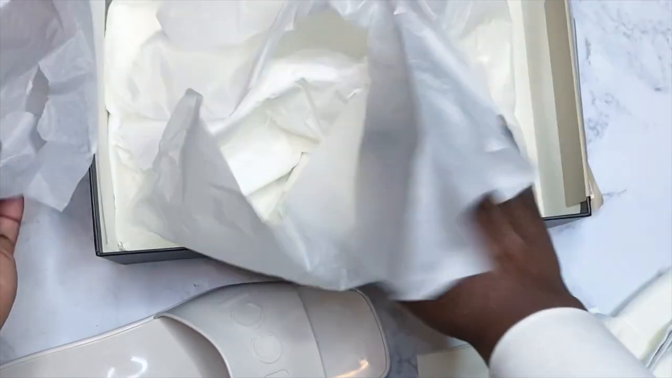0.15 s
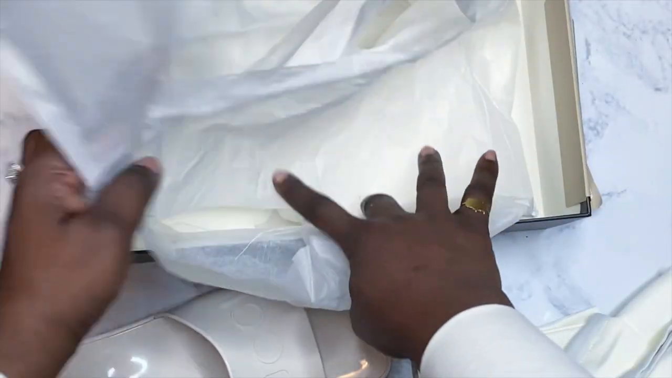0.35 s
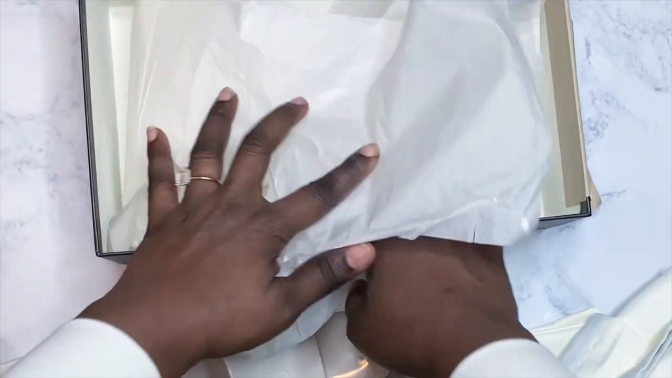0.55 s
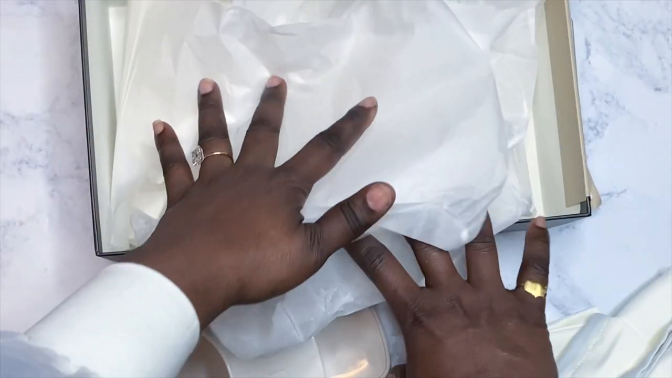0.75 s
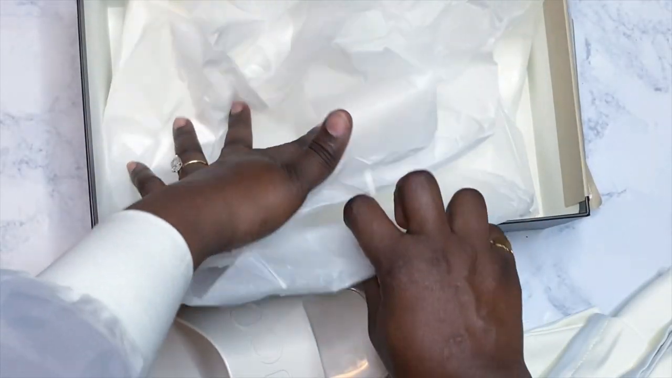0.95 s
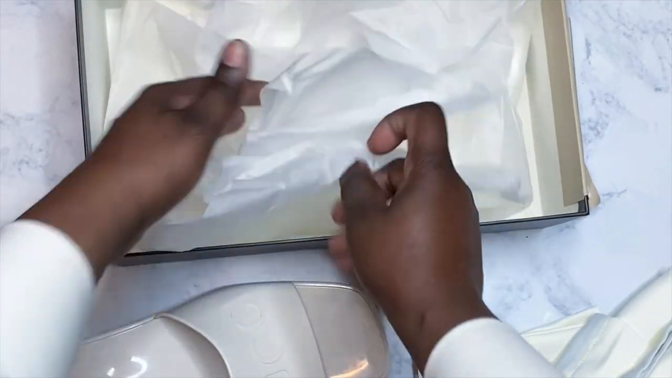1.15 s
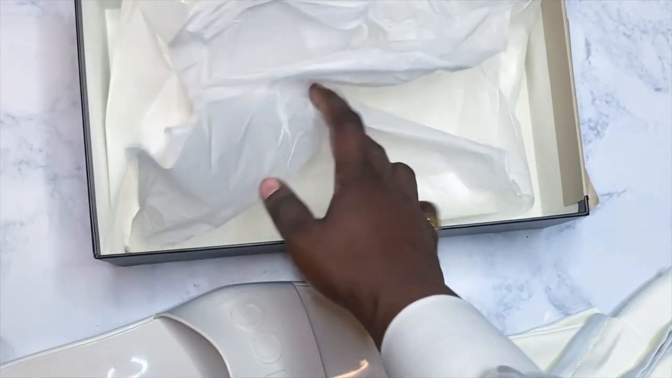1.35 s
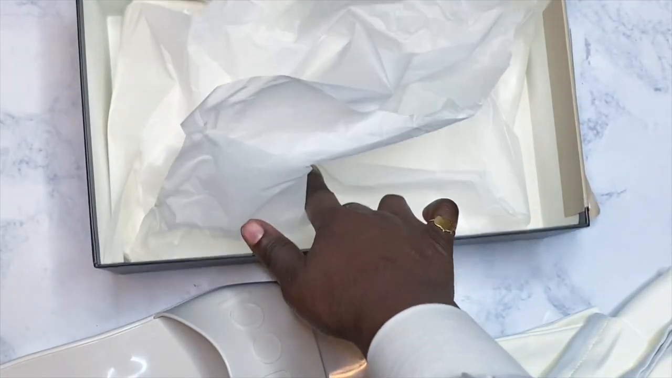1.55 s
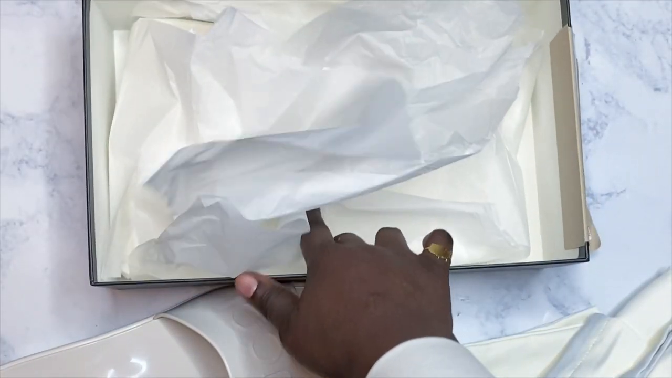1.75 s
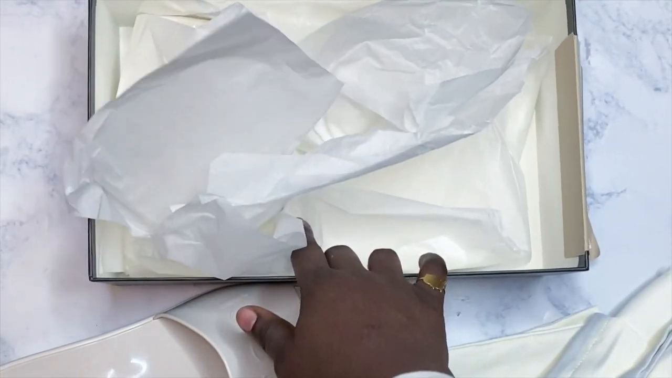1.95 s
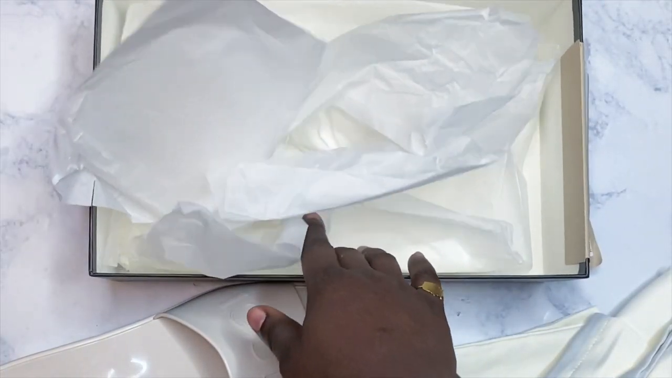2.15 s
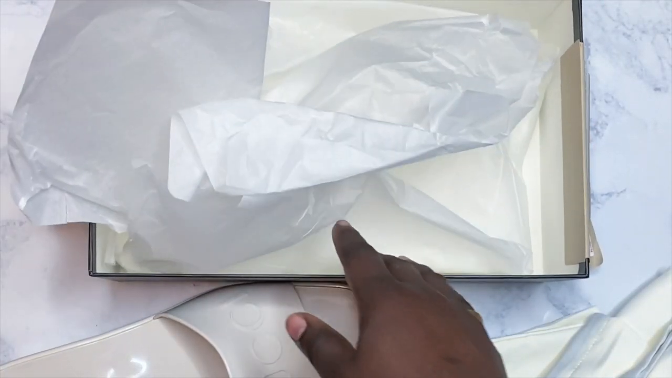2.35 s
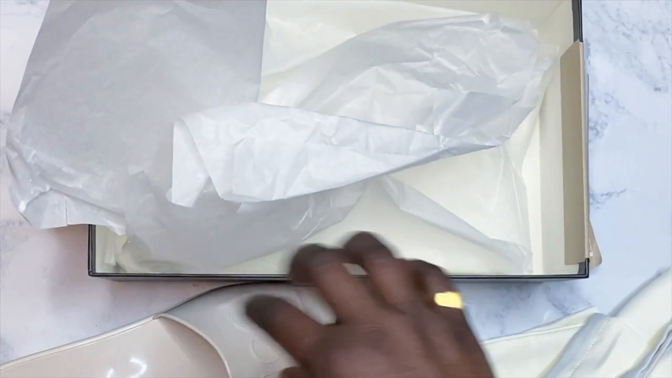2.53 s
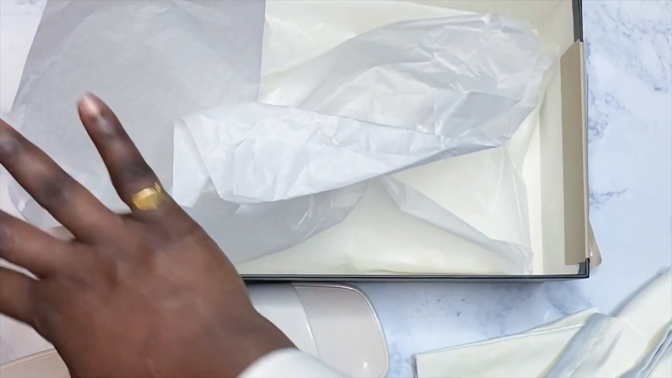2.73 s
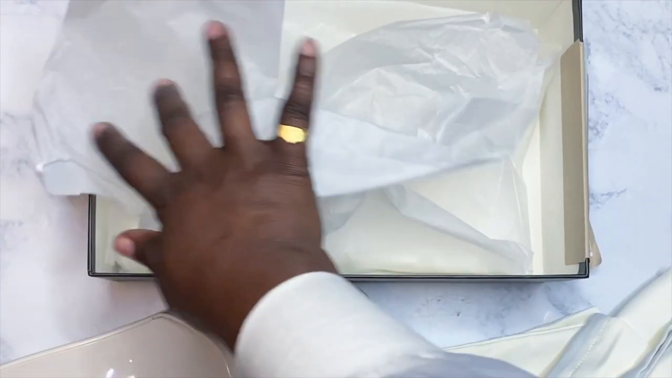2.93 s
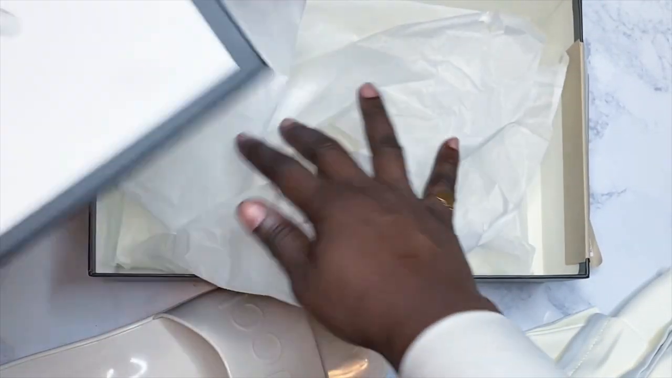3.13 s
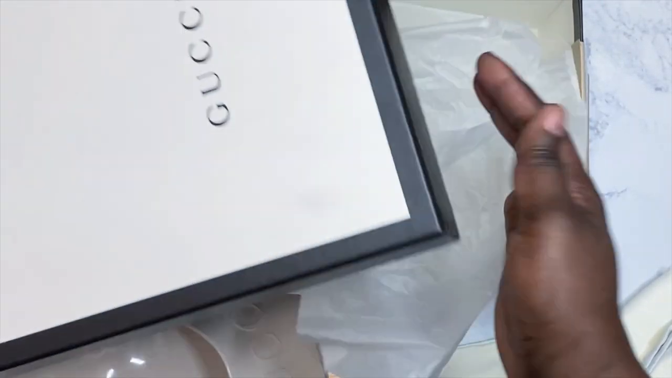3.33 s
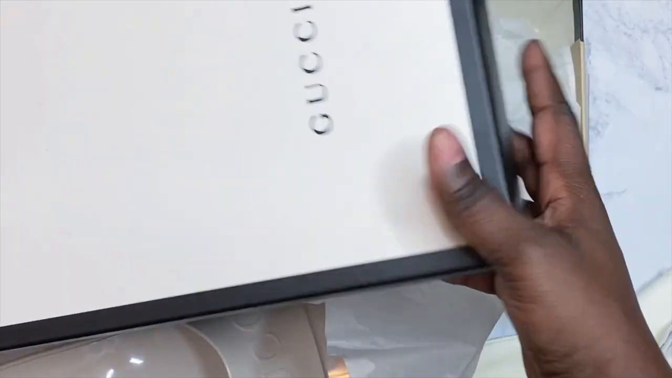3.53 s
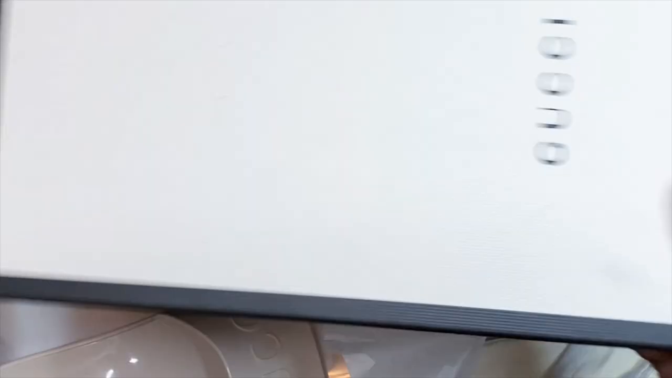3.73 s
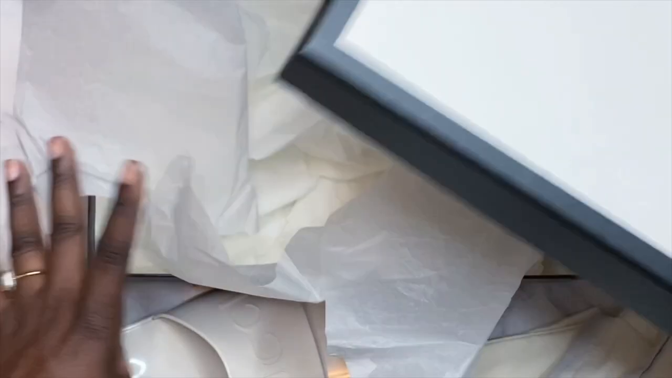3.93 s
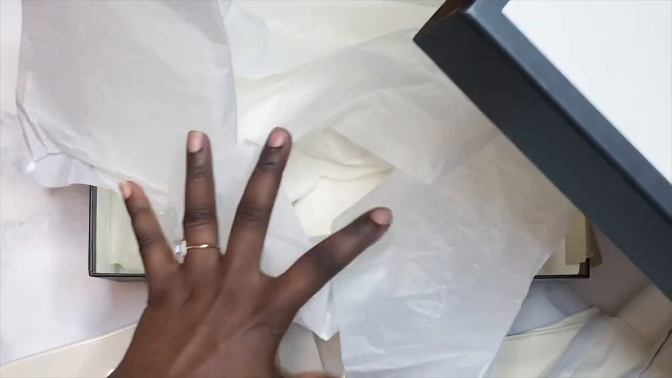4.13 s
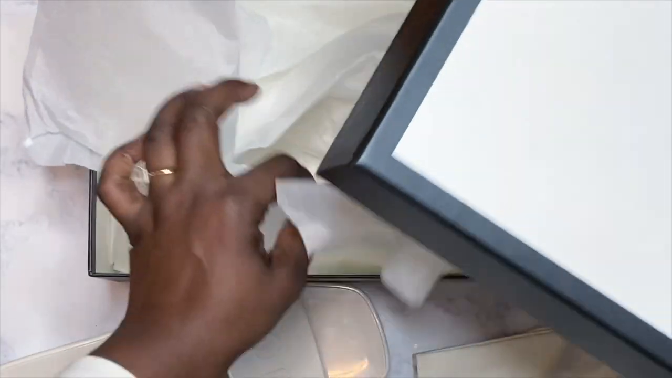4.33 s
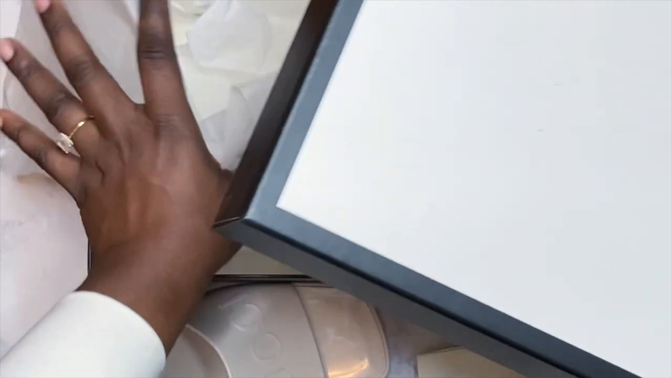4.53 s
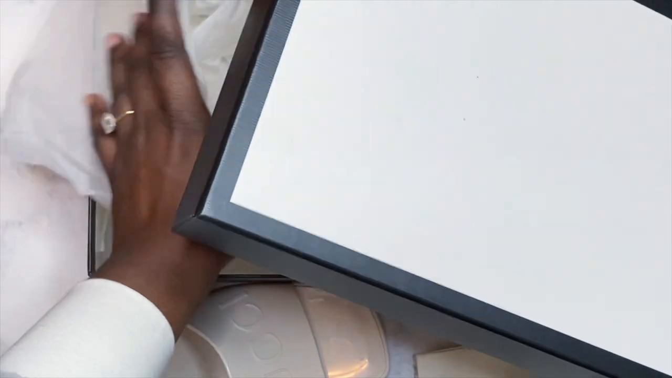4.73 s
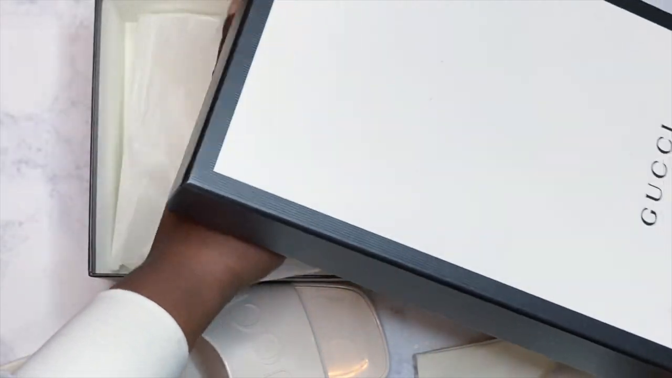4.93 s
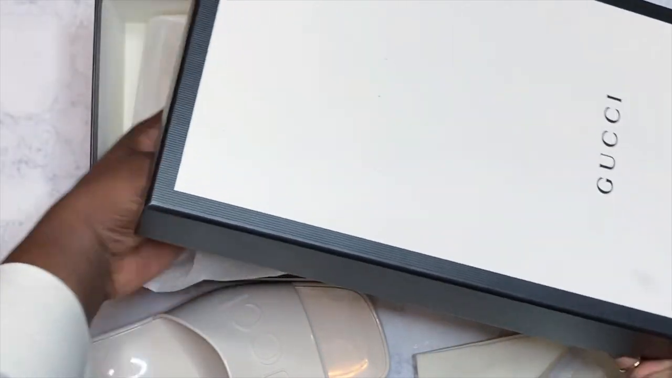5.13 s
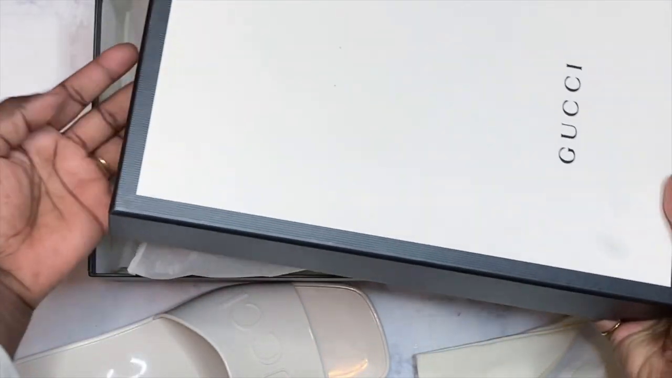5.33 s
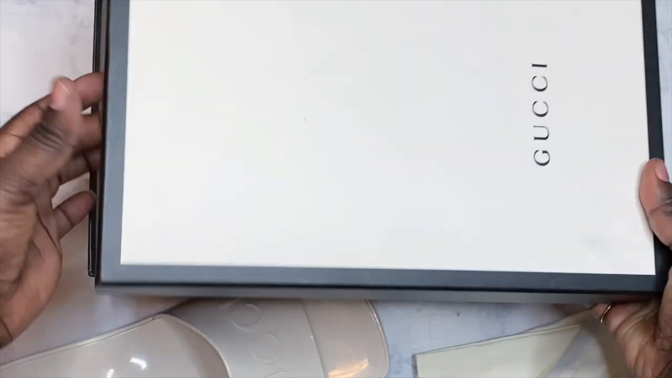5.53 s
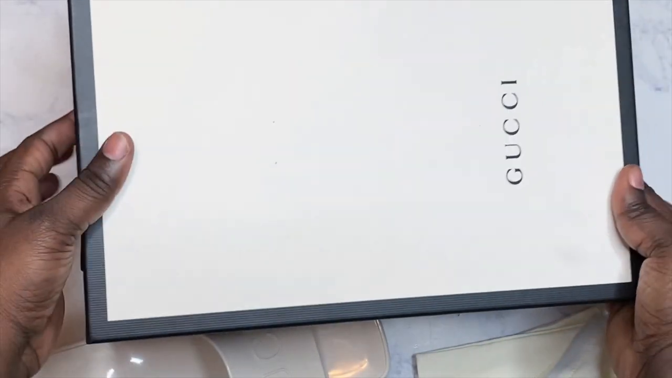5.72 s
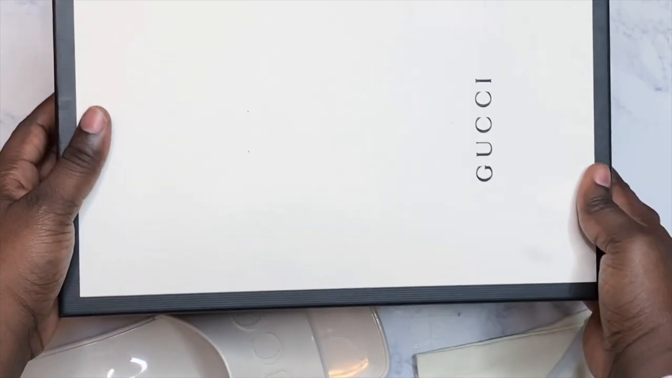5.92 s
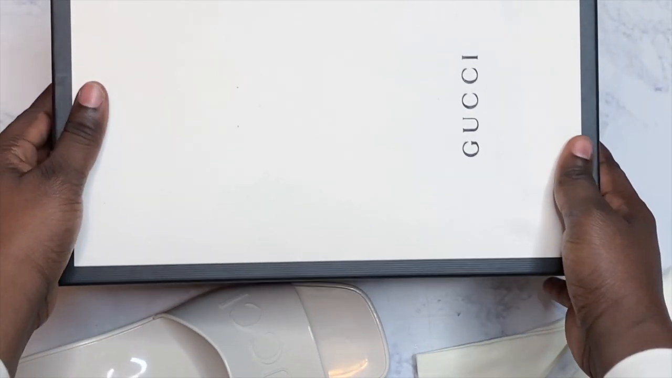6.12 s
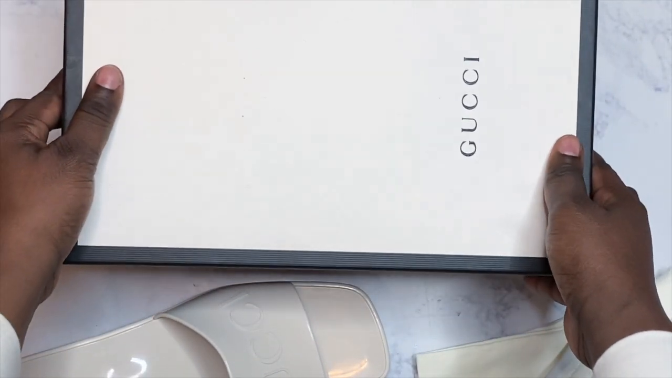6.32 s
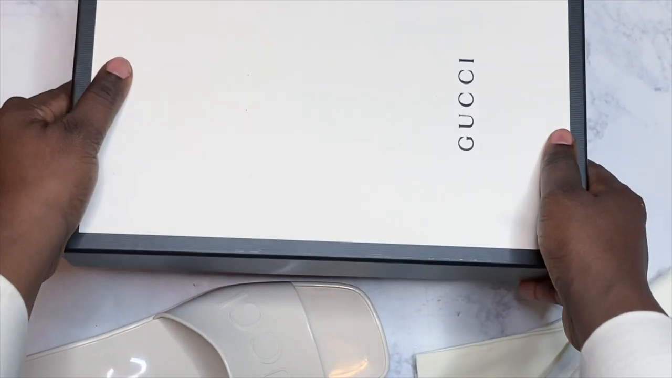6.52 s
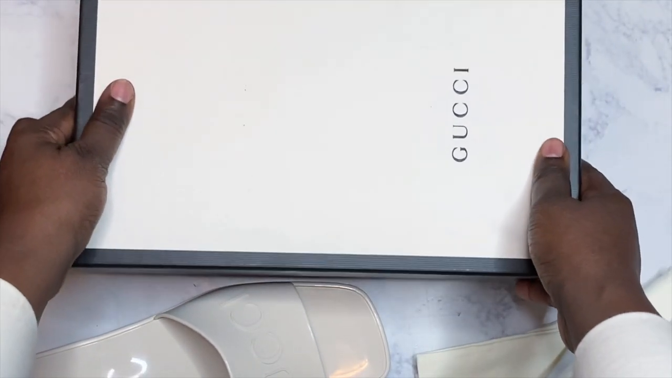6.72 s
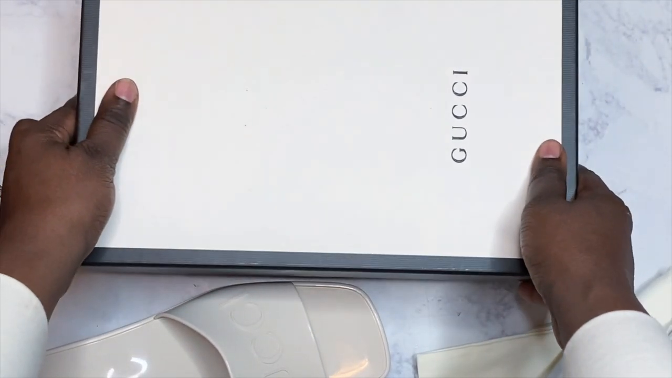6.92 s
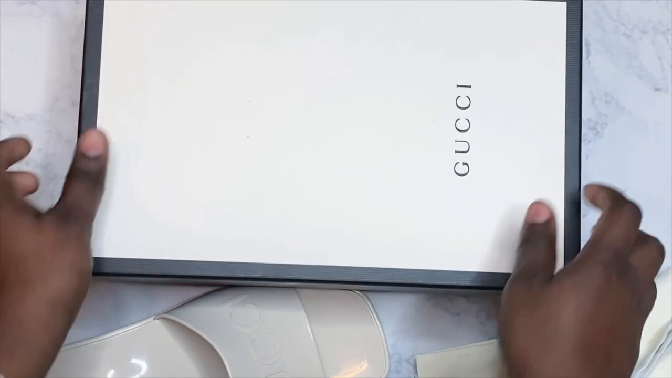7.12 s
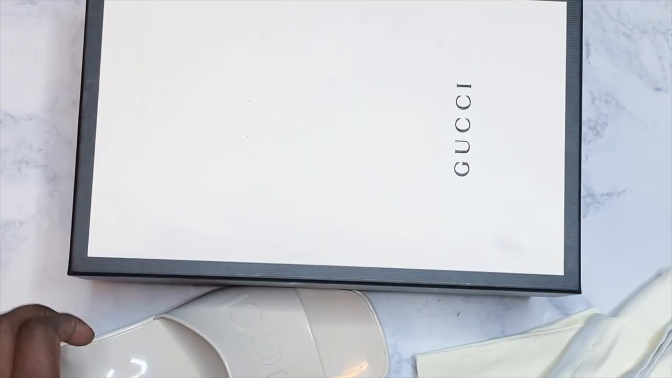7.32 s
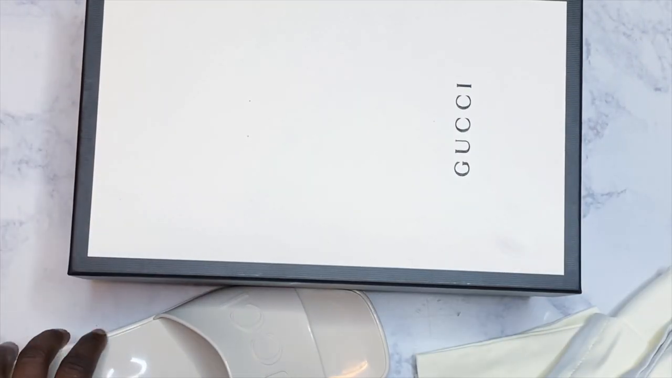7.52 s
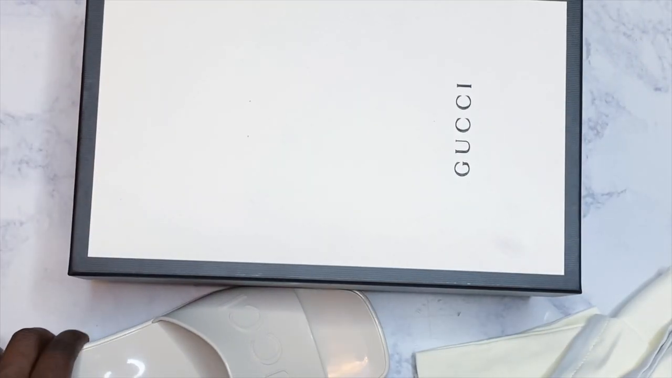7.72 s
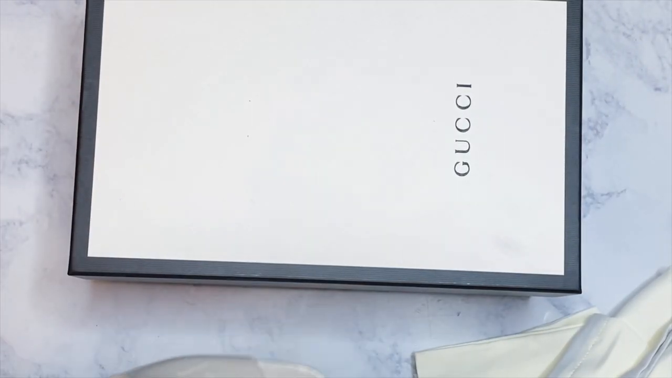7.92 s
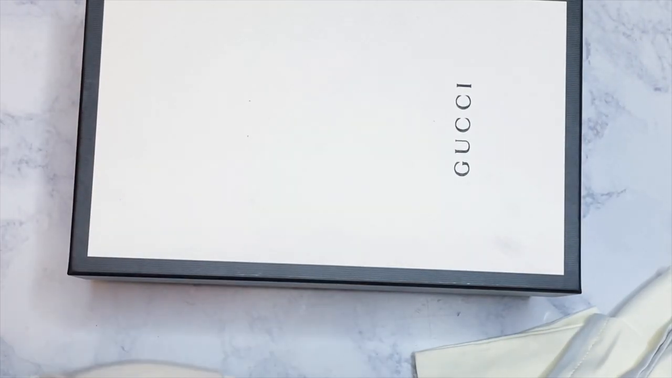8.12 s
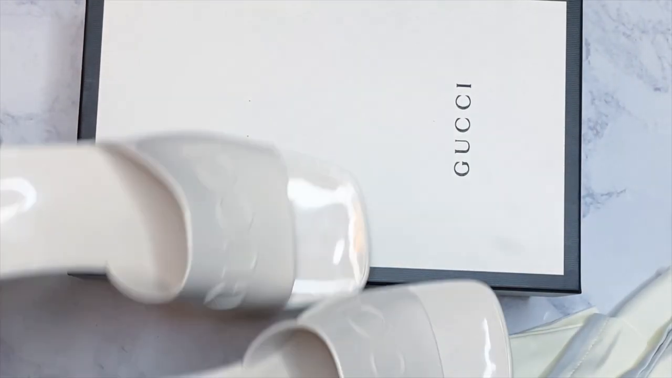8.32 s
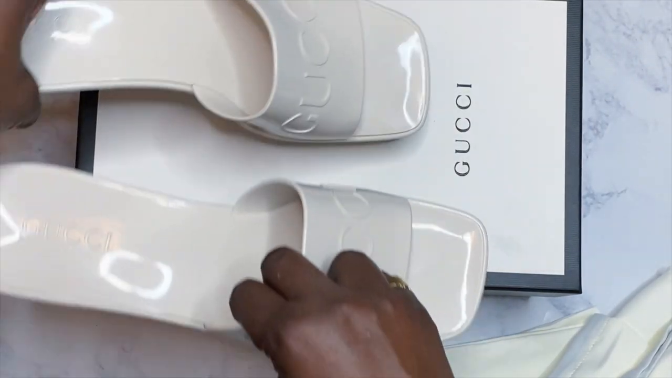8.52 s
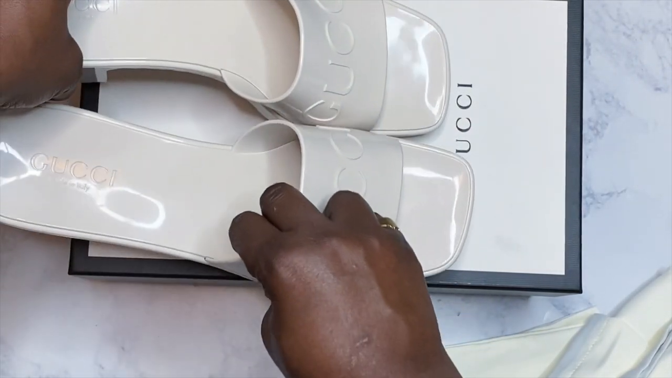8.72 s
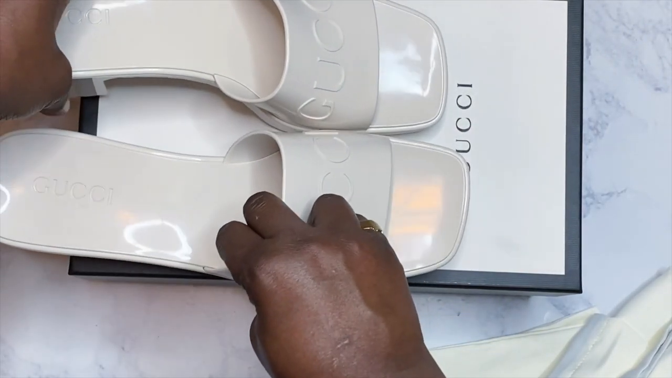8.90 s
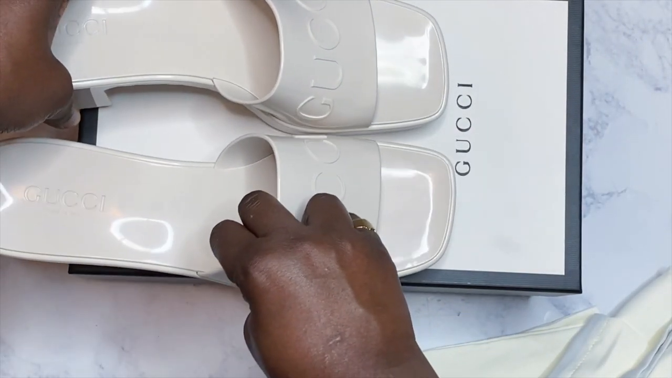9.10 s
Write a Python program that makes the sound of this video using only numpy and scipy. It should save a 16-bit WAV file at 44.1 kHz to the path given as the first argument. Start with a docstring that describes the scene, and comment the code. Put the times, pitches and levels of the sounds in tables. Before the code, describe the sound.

Close, crisp paper rustling fades, a box lid slides down with hollow knocks, and two sandals are set on it in a quiet room.

```python
"""First, right by the microphone, hands press and smooth tissue paper into a cardboard shoebox on a table.
The place is a small, quiet room. The lid is fetched, bumps the box, is shoved squeaking down over the rim
and knocks home; then two sandals are set on top. Paper, sliding lid and brushes are random bursts of noise
shaped by spectra and hand movements; squeaks are gliding tones; knocks ring the modes of the box.
Behind them lie filtered-noise air and rumble, and a faint buzz of mains-rate spikes."""
import sys
import numpy as np
from scipy import signal
from scipy.fft import rfft, irfft, next_fast_len
from scipy.io import wavfile
from scipy.ndimage import uniform_filter1d

SR = 44100
rng = np.random.default_rng(int(sys.argv[2]) if len(sys.argv) > 2 else 0)


def bounce(signal):
    """Save signal as a 16-bit WAV file at the path given by the first command-line argument."""
    frames = np.transpose(np.atleast_2d(signal))
    limited = np.clip(frames, -1, 1)
    pcm = np.round(limited * 32767).astype(np.int16)
    wavfile.write(sys.argv[1], SR, pcm)


N = 408366  # samples, about 9.3 s


def from_db(db):
    """Amplitude ratio of a level in dB."""
    return 10 ** (np.asarray(db) / 20)


def rms_one(x):
    """Scale to an rms of 1."""
    return x / np.sqrt(np.mean(x ** 2) + 1e-20)


def drift(rate):
    """Smooth random wandering of rms 1, with a new target `rate` times a second."""
    knots = rng.standard_normal(int(rate * N / SR) + 3)
    return rms_one(np.interp(np.arange(N) * rate / SR, np.arange(len(knots)), knots))


def coloured(x, spectrum):
    """Causal (minimum-phase) filter with the given spectrum and unit mean power gain."""
    size = next_fast_len(len(x) + 4096)
    size += size % 2
    hz, db = np.transpose(spectrum)
    octave = np.log2(np.maximum(np.fft.rfftfreq(size, 1 / SR), 1))
    below = np.maximum(np.log2(hz[0]) - octave, 0)
    above = np.maximum(octave - np.log2(hz[-1]), 0)
    # beyond the listed points it falls 20 dB per octave, for two octaves
    level_db = np.interp(octave, np.log2(hz), db) - 20 * np.minimum(below + above, 2)
    gain = rms_one(from_db(level_db))
    # folding the cepstrum onto positive times gives the minimum phase
    cepstrum = irfft(np.log(gain))
    cepstrum[1:size // 2] *= 2
    cepstrum[size // 2 + 1:] = 0
    return irfft(rfft(x, size) * np.exp(rfft(cepstrum)), size)[:len(x)]


def band(x, low_hz, high_hz):
    """Keep the sound between two frequencies."""
    edges = [low_hz, min(high_hz, .45 * SR)]
    return signal.sosfilt(signal.butter(2, edges, "band", fs=SR, output="sos"), x)


def add(out, s, sound):
    """Mix a sound in at a time; what lies before zero is cut off."""
    start, sound = max(round(s * SR), 0), sound[max(-round(s * SR), 0):]
    out[start:start + len(sound)] += sound[:len(out) - start]


def grains(per_s, spread_db, ring_s, smooth):
    """Random tiny bursts, a few large among many small, over a share of smooth friction; rms 1."""
    size_db = spread_db * np.minimum(rng.exponential(1, N), 4.5)
    energy = (rng.random(N) < per_s / SR) * from_db(size_db) ** 2
    energy = signal.lfilter([1], [1, -np.exp(-2 / (ring_s * SR))], energy + 1e-18)
    return rms_one(np.sqrt(energy / energy.mean() + smooth) * rng.standard_normal(N))


ATTACK_S, RELEASE_DB_PER_S = 0.013, 275


def movement(start_s, length_s, level_db, build_db=0):
    """Gain of one hand movement: quick attack, a hold that builds or eases, release."""
    gain, t = np.zeros(N + SR), np.arange(int((length_s + .3) * SR)) / SR
    hold_db = level_db + build_db * (np.minimum(t / length_s, 1) - .5)
    release_db = RELEASE_DB_PER_S * np.maximum(t - length_s, 0)
    add(gain, start_s, np.minimum(t / ATTACK_S, 1) * from_db(hold_db - release_db))
    return gain[:N]


def movements(rows):
    """Overlapping movements add in power."""
    return np.sqrt(sum(movement(*row) ** 2 for row in rows))


# spectrum of the quiet room air: (frequency [Hz], relative density [dB])
AIR_SPECTRUM = [(32, -41), (55, -12.5), (159, -6.5), (232, -16.5), (267, -8.5), (339, -10.5), (439, -15.5),
                (850, -20), (934, -22), (1730, -29.5), (1900, -31.5), (15500, -43.5)]
# spectrum of the deep rumble below it: (frequency [Hz], relative density [dB])
RUMBLE_SPECTRUM = [(12, -12.5), (20, 5), (28, -3), (38, -21), (55, -18), (90, -26)]
AIR_DB, RUMBLE_DB, RUMBLE_WANDER_DB = -66.5, -54, 1.5


def backdrop():
    """Filtered noise: quiet room air over a deep rumble that slowly swells and sinks."""
    # one extra second lets the filters settle
    air = rms_one(coloured(rng.standard_normal(N + SR), AIR_SPECTRUM)[SR:])
    rumble = rms_one(coloured(rng.standard_normal(N + SR), RUMBLE_SPECTRUM)[SR:])
    return from_db(AIR_DB) * air + from_db(RUMBLE_DB + RUMBLE_WANDER_DB * drift(2.37)) * rumble


BUZZ_HZ, BUZZ_DB = 119.95, -79


def buzz(low_hz=3500, jitter_s=.00004):
    """Faint electrical buzz: a short, slightly unsteady spike on every half wave of the mains."""
    spikes, times = np.zeros(N), np.arange(0, N / SR, 1 / BUZZ_HZ)
    times = times + jitter_s * rng.standard_normal(len(times))
    spikes[np.clip(times * SR, 0, N - 1).astype(int)] = 1
    highpass = signal.butter(1, low_hz, "high", fs=SR, output="sos")
    return from_db(BUZZ_DB) * rms_one(signal.sosfilt(highpass, spikes + 1e-18))


ROOM_T60_S = 0.28


def room(x, first_s, dull_hz):
    """Diffuse tail of the small room: decaying noise, band-limited, that smears the sound."""
    t = np.arange(int(.6 * SR)) / SR
    tail = rng.standard_normal(len(t)) * from_db(-60 * t / ROOM_T60_S) * (t > first_s)
    return signal.fftconvolve(x, band(tail / np.linalg.norm(tail), 67, dull_hz))[:N]


# hands and soles brush lightly over the cardboard: (start [s], length [s], level [dB], centre [Hz])
BRUSH_STROKES = [(7.042, 0.17, -73, 1680), (7.703, 0.21, -80.5, 900), (9.12, 0.078, -76, 5500)]


def brushes(reach=1.63):
    """Soft, broad friction of a light touch."""
    friction = grains(per_s=180, spread_db=0.5, ring_s=.003, smooth=1.0)
    out = np.zeros(N)
    for s, length, db, hz in BRUSH_STROKES:
        out += movement(s, length, db) * rms_one(band(friction, hz / reach, hz * reach))
    return out


# the box wall groans as hand and lid drag across it: (start [s], length [s], level [dB])
WALL_GROANS = [(4.75, 0.16, -49.5), (4.97, 0.2, -48), (5.64, 0.039, -53)]
GROAN_HZ, GROAN_REACH = 369, 1.14  # the band spans this ratio to either side


def groan():
    """Uneven slips keep one panel resonance going."""
    slips = grains(per_s=160, spread_db=6.0, ring_s=0.015, smooth=0.83)
    panel = band(slips, GROAN_HZ / GROAN_REACH, GROAN_HZ * GROAN_REACH)
    return movements(WALL_GROANS) * rms_one(panel)


# faint squeaks of the tight lid:
# (start [s], length [s], level of the fundamental [dB], starting pitch [Hz], climb [Hz per s])
LID_SQUEAKS = [(5.775, 0.19, -77, 3560, 800), (5.99, .015, -62, 3800, 2480), (6.46, 0.063, -69, 2720, 4500),
               (6.563, 0.11, -62, 3010, 5000)]


def squeaks(waver_per_s=640, second_db=-6, third_db=-1):
    """A broken, narrow squeak with two overtones that climbs as the lid binds."""
    out, t = np.zeros(N), np.arange(N) / SR
    waver = drift(waver_per_s) + 1j * drift(waver_per_s)  # unsteady in strength and phase
    stutter = rms_one(from_db(3 * drift(160)))
    for s, length, db, start_hz, climb_hz_per_s in LID_SQUEAKS:
        pitch_hz = start_hz + climb_hz_per_s * np.clip(t - s, 0, length)
        turn = np.exp(2j * np.pi * np.cumsum(pitch_hz) / SR)
        overtones = from_db(second_db) * turn ** 2 + from_db(third_db) * turn ** 3
        out += movement(s, length, db) * np.real(waver * (turn + overtones))
    return stutter * out


# shoves that work the lid down: (start [s], length [s], rasp [dB], build-up [dB],
# drone of the panels [dB], boom of the air inside [dB])
LID_SHOVES = [(5.445, 0.13, -56.5, -4, -55.5, -65), (5.602, 0.33, -63, -4, -58, -65.5),
              (5.947, 0.29, -61.5, -2, -59, -77), (6.201, 0.18, -60.5, 3, -52.5, -49.5),
              (6.39, 0.25, -61.5, 8, -54.5, -55.5), (6.594, 0.068, -53, 9, -53.5, -53),
              (6.686, .13, -68.5, -1.5, -59.5, -60), (6.908, 0.074, -68.5, 15, -61, -55)]
# spectra of the rasp, the panels and the enclosed air: (frequency [Hz], relative density [dB])
RASP_SPECTRUM = [(1290, -24), (2200, -14), (3080, -6.5), (5450, -6), (7930, -4.5), (8890, -7.5),
                 (11300, -2.5), (15500, -21)]
DRONE_SPECTRUM = [(200, -11), (290, -5), (395, -2.5), (520, -5.5), (700, -8), (1000, -10.5), (1400, -14.5),
                  (2200, -25.5)]
BOOM_SPECTRUM = [(100, -13), (160, -3.5), (208, 2.5), (255, 3.5), (340, -8), (600, -47)]


def lid_slide():
    """Cardboard sticks and slips on cardboard: a rasp, droning panels and a hollow boom."""
    start, length, rasp_db, build_db, drone_db, boom_db = np.transpose(LID_SHOVES)
    rasp, drone, boom = (movements(zip(start, length, db, build_db)) for db in (rasp_db, drone_db, boom_db))
    catching = drift(45)  # the lid catches and lets go
    fibres = grains(per_s=340, spread_db=5.0, ring_s=0.0032, smooth=0.98) * from_db(0.28 * catching)
    slips = grains(per_s=160, spread_db=1.0, ring_s=0.0075, smooth=1.0) * from_db(1.1 * catching)
    out = rasp * coloured(fibres, RASP_SPECTRUM)
    out += drone * coloured(slips, DRONE_SPECTRUM)
    return out + boom * coloured(slips, BOOM_SPECTRUM)


# modes of the cardboard box on its table: (frequency [Hz], relative level [dB])
BOX_MODES = [(88, -8), (106, 2.5), (162, -3), (208, 1.5), (250, 0), (298, -2), (345, 3.5), (395, -2),
             (473, -3), (560, -6), (610, 1), (670, -9.5), (800, -6), (895, -0.5), (990, -2), (1080, -6.5),
             (1276, -13), (1480, -40), (1690, -11), (2000, -13)]
BOX_T60_S, BOX_DAMPING = 0.14, 0.54  # ring time at 200 Hz; octaves it shortens per octave of pitch


def box_ring(t, uneven_db, scatter_rad=1.0):
    """The box after one push; each spot favours other modes, and high modes die first."""
    chance = rng.standard_normal((len(BOX_MODES), 2))
    hz, db = np.transpose(BOX_MODES)[:, :, None]
    t60 = BOX_T60_S * 2 ** (-BOX_DAMPING * np.log2(hz / 200))
    heights = from_db(db + uneven_db * chance[:, :1] - 60 * t / t60)
    return np.sum(heights * np.sin(2 * np.pi * hz * t + scatter_rad * chance[:, 1:]), axis=0)


# knocks on box and lid: (time [s], strength [dB], panel pitch [Hz], panel breadth [share of its pitch],
# then relative to the strength: weight [dB], edge tap [dB], tick before a common 1.5 dB cut [dB])
BOX_KNOCKS = [(1.603, -48, 394, .32, -18, -15, -11), (2.091, -49, 547, 1, -1, 2.5, 5.5),
              (2.476, -60.5, 580, 0.21, -11, -3, -3.5), (3.178, -36.5, 567, 0.17, -16, -3, -16),
              (3.394, -62.5, 493, 0.53, 10, 2, -1.5), (3.554, -62.5, 670, 0.26, -0.5, -3, -2),
              (5.191, -50, 394, 0.19, -8.5, -6, -20), (5.919, -47, 480, 0.42, -24, -16, -31),
              (6.162, -47.5, 336, 0.42, -2, -20, -34), (6.233, -41.5, 607, 0.45, -2, -19, -31),
              (6.31, -51.5, 550, 0.21, -16, -5, -22), (6.62, -50.5, 464, 0.4, 3, -11, -24),
              (6.671, -39, 450, 0.59, -7, -31, -36), (6.762, -57.5, 439, .4, 2, -14, -22),
              (6.88, -59, 394, 0.62, -4, -11, -12), (6.974, -39, 350, 0.34, -8, -19, -34),
              (7.432, -77, 446, 0.58, 2, -13, -24), (8.543, -37, 458, .27, 1, -14, -25.5),
              (8.683, -51.5, 354, 0.4, 6.5, -8.5, -11.5), (8.714, -55.5, 350, 0.34, 1, -21, -25),
              (8.732, -64, 420, 0.69, -5, -13, -9), (8.85, -54.5, 358, 0.73, 10, -15, -39),
              (8.872, -68.5, 352, 0.5, 13, 2, -1.5), (8.935, -42.5, 600, 0.39, 3, -16, -23),
              (8.983, -47, 370, 0.5, -10, -26, -37), (9.06, -60, 567, .45, 0, -11, -14)]
# spectrum of the tick: (frequency [Hz], relative density [dB])
TICK_SPECTRUM = [(900, -31), (1500, 12.5), (2400, 1), (3500, -1.5), (6000, -8.5), (11000, -7.5),
                 (15000, -38)]
# a knock's weight thumps the table through the open box; with the lid on it mostly thuds in the enclosed air
LID_ON_S, THUMP_OPEN_DB, THUMP_CLOSED_DB = 5.5, 1.5, -10.5


def knocks(flex_db=6, flex_s=0.0047, contact_s=0.00045, tick_s=0.013, scuff_db=12,
           crack_db=-14, crack_s=0.0039, body_db=-13):
    """Each contact cracks and flexes the cardboard sharply, then leaves the modes ringing."""
    out, t = np.zeros(N), np.arange(int(.4 * SR)) / SR

    def at_level(db, x):
        """Set the rms level over the first 40 ms."""
        return from_db(db) * x / np.sqrt(np.mean(x[t < .04] ** 2))

    for s, db, panel_hz, breadth, weight_db, tap_db, tick_db in BOX_KNOCKS:
        ring = box_ring(t, uneven_db=1.3) * (1 - np.exp(-t / contact_s))
        flexed = ring * (1 + from_db(flex_db) * np.exp(-t / flex_s))
        scuff = rng.standard_normal(len(t)) * np.exp(-t / tick_s)
        edge = flexed + from_db(scuff_db) * scuff  # the edge scuffs as it lands
        tap = band(band(edge, 780, 1500), 650, 6000)
        crack = band(rng.standard_normal(len(t)) * np.exp(-t / crack_s), 1200, 2800)
        panel = band(flexed, panel_hz / (1 + breadth), panel_hz * (1 + breadth))
        thump_db = THUMP_OPEN_DB if s < LID_ON_S else THUMP_CLOSED_DB
        knock = at_level(db, panel) + at_level(db + body_db, flexed)
        knock += at_level(db + weight_db + thump_db, band(ring, 64, 140))
        knock += at_level(db + weight_db, band(flexed, 167, 287))
        knock += at_level(db + tap_db, tap) + at_level(db + tap_db + crack_db, crack)
        knock += at_level(db + tick_db - 1.5, coloured(scuff, TICK_SPECTRUM))
        add(out, s, knock)
    return out


# hand strokes on the tissue: (start [s], length [s], crinkle [dB], build-up over the stroke [dB],
# extra swish [dB], extra flutter of the sheet [dB])
PAPER_STROKES = [(-0.03, 0.19, -38, 4, -2, -0.5), (0.135, 0.19, -35.5, 1, 1, .5),
                 (0.36, 0.076, -40, 6, -3.5, -2.5), (0.439, 0.17, -38, 2, -.5, 2),
                 (0.615, 0.11, -43, -1, 0.5, -0.5), (0.743, .123, -35.5, 4.5, -1, 3.5),
                 (0.87, .075, -33, -2, 2.5, 5), (0.961, 0.42, -39.5, -0.5, 1.5, -1),
                 (1.372, 0.08, -38.5, -4.5, 5.5, 0.5), (1.495, .13, -62, 16, 6.5, 4),
                 (1.633, .14, -45, 4, 1.5, -3.5), (1.772, 0.28, -55.5, -4, 4, 1),
                 (1.995, 0.13, -50.5, 5, 1, -1.5), (2.126, 0.16, -49.5, -7.5, -0.5, -3.5),
                 (2.32, 0.12, -71, 0, 0, -2), (2.551, 0.23, -73, -4, 2.5, -2),
                 (2.811, 0.075, -59, 7, 5.5, -1.5), (2.889, 0.21, -49, 2, 4, -2.5),
                 (3.117, 0.19, -48.5, -3.5, -1, -5), (3.33, 0.296, -72, 6, 3.5, 4),
                 (3.624, 0.056, -62, 10, 1.5, 1), (3.826, 0.047, -61, 11, 0.5, 0),
                 (3.978, 0.14, -50.5, 0, -1, -1.5), (4.147, 0.11, -41, -4, 1, -1.5),
                 (4.28, 0.44, -50.5, 2.5, 0.5, -1), (4.657, 0.088, -38.5, 10.5, -1.5, 1.5),
                 (4.759, 0.15, -43.5, 3, 2.5, 2.5), (4.922, 0.14, -44.5, 7, 1.5, 3),
                 (5.099, 0.12, -46.5, -3, 0, 2), (5.241, 0.084, -53, 2, 2, 2),
                 (5.343, 0.11, -59.5, -10, 0, 2)]


def stroke_effort():
    """Gain of the crinkle as the hands work the tissue."""
    return movements(row[:4] for row in PAPER_STROKES)


# separate snaps and ticks of paper and edges, loud to very faint:
# (time [s], peak before a common 3.5 dB cut [dB])
SNAPS_AND_TICKS = [(0.319, -24), (0.7572, -18), (0.942, -16), (1.258, -19), (1.3127, -24), (1.4454, -18.5),
                   (1.5658, -26.5), (1.617, -26), (1.9216, -30), (2.396, -39), (2.5601, -41), (2.634, -42),
                   (2.823, -43), (2.8786, -27.5), (3.809, -45), (3.9954, -26.5), (4.0748, -21),
                   (4.154, -27), (4.1875, -20), (4.617, -24), (5.1088, -32), (6.0092, -41), (6.2027, -34.5),
                   (7.102, -53), (8.115, -56)]
# spectra of crinkling and of sliding sheets: (frequency [Hz], relative density [dB])
CRINKLE_SPECTRUM = [(2500, -29.5), (4000, -8.5), (5500, -3.5), (8000, -2), (9800, -0.5), (11500, 1),
                    (13000, -4.5), (15500, -17)]
SWISH_SPECTRUM = [(900, -3), (1400, -0.5), (1900, -0.5), (2400, -4), (3300, -0.5), (4500, -4), (7000, -6.5)]
# random snaps while the paper moves: rate, typical peak over the crinkle before the same cut, spread
SNAPS_PER_S, SNAP_OVER_DB, SNAP_SPREAD_DB = 9, 8, 12


def snaps_and_ticks(effort, snap_s=0.0005, settle_s=0.0089, settle_db=-14, cut_db=-3.5):
    """Each listed snap or tick cracks and briefly settles; more come at random, following the stroke."""
    out, t = np.zeros(N), np.arange(int(.05 * SR)) / SR
    shape = np.exp(-t / snap_s) + from_db(settle_db) * np.exp(-t / settle_s)
    over_db = SNAP_OVER_DB + SNAP_SPREAD_DB * rng.standard_normal(N)
    random_peaks = (rng.random(N) < SNAPS_PER_S / SR) * effort * from_db(over_db)
    snaps = [(s, from_db(db)) for s, db in SNAPS_AND_TICKS]
    snaps += [(i / SR, random_peaks[i]) for i in np.flatnonzero(random_peaks)]
    noise = rng.standard_normal(N + SR)
    for s, peak in snaps:
        burst = shape * noise[round(s * SR):][:len(t)]
        snap = coloured(burst, CRINKLE_SPECTRUM) + from_db(-10) * coloured(burst, SWISH_SPECTRUM)
        add(out, s, peak * from_db(cut_db) * snap / np.abs(snap).max())
    return out


def facets(x, shifts_per_s=28, width_hz=1000, depth=.32):
    """Small facets of the sheet radiate at pitches of their own, which come and go as it folds."""
    out = x.copy()
    for hz in np.linspace(3500, 12500, num=11):
        peak = signal.lfilter(*signal.iirpeak(hz, hz / width_hz, fs=SR), x)
        out += depth * drift(shifts_per_s) * peak
    return rms_one(out)


# spectrum of the sheet flapping as a whole: (frequency [Hz], relative density [dB])
FLUTTER_SPECTRUM = [(90, -41), (200, -16.5), (300, -7.5), (480, -0.5), (700, -2.5), (1000, -4.5),
                    (1400, -10), (2200, -17), (4000, -39)]
# at a firm stroke: its crinkle, the swish of sliding sheets and their flutter
FIRM_DB, SWISH_DB, FLUTTER_DB = -40.5, -49, -47.5
SWISH_FOLLOWS, FLUTTER_FOLLOWS = 0.79, 0.7  # share of the crinkle's swing, so gentle strokes sound duller


def paper(effort):
    """Countless creases buckle at once, a few more loudly; sheets swish over each other and flutter as a whole."""
    start, length, db, build_db, more_swish_db, more_flutter_db = np.transpose(PAPER_STROKES)

    def following(firm_level_db, share):
        """Gain that follows a share of the crinkle's swing."""
        level_db = firm_level_db + share * (db - FIRM_DB)
        return movements(zip(start, length, level_db, share * build_db))

    clumps = drift(70)  # creases give way in small avalanches
    buckling = grains(per_s=650, spread_db=2.0, ring_s=0.0024, smooth=0.83)
    # larger creases sound lower too, so the pops also feed the swish
    pops = from_db(-11.0) * grains(per_s=90, spread_db=1.0, ring_s=0.00056, smooth=0.0122)
    crinkle = effort * from_db(0.07 + 0.5 * clumps) * facets(coloured(buckling + pops, CRINKLE_SPECTRUM))
    sliding = grains(per_s=1200, spread_db=0.5, ring_s=0.0019, smooth=.4)
    swish = following(SWISH_DB + more_swish_db, SWISH_FOLLOWS) * from_db(1.2 * clumps)
    swish *= coloured(sliding + pops, SWISH_SPECTRUM)
    flapping = grains(per_s=300, spread_db=3.5, ring_s=0.012, smooth=0.64)
    flutter = following(FLUTTER_DB + more_flutter_db, FLUTTER_FOLLOWS) * from_db(0.35 * clumps)
    flutter *= coloured(flapping, FLUTTER_SPECTRUM)
    return crinkle + swish + flutter


def scene():
    """Paper and box close to the microphone, with a little of the room."""
    bumps = knocks()
    effort = stroke_effort()
    rustle = brushes() + groan() + squeaks() + lid_slide() + snaps_and_ticks(effort) + paper(effort)
    tail = room(from_db(-10.0) * rustle + from_db(-7.5) * bumps, first_s=0.00075, dull_hz=13500)
    return (backdrop() + buzz() + tail + bumps + rustle)[None]


CUTOFF_HZ = 15800


def record(dry):
    """A steep elliptic low-pass cuts the top."""
    return signal.sosfilt(signal.ellip(12, .1, 80, CUTOFF_HZ, fs=SR, output="sos"), dry)


dry = scene()
out = record(dry)
bounce(out)
```